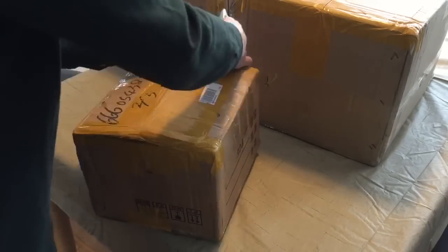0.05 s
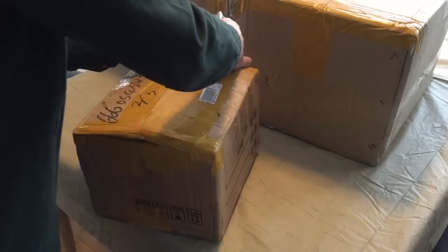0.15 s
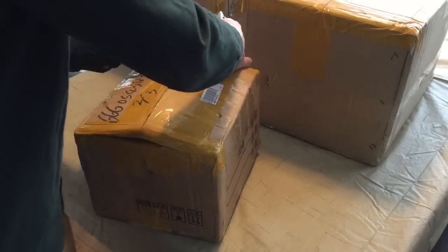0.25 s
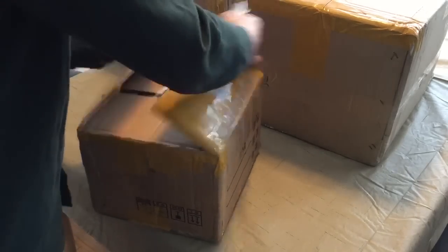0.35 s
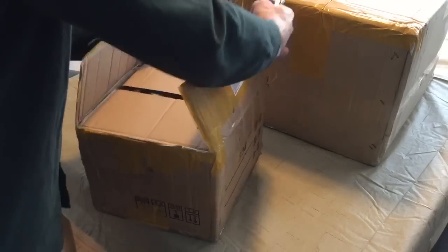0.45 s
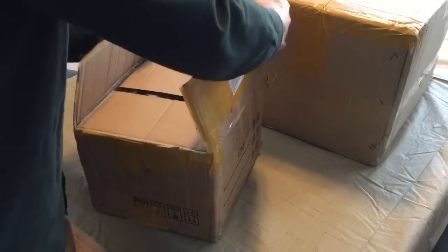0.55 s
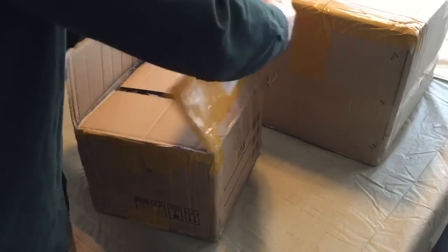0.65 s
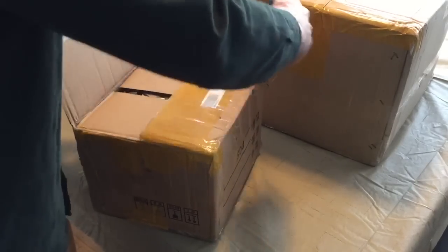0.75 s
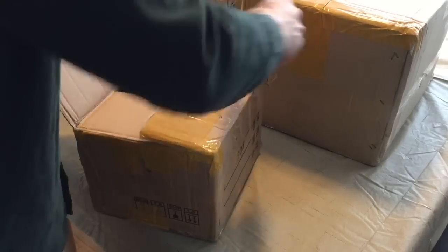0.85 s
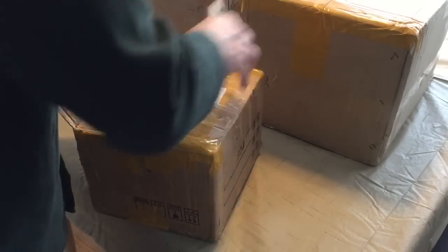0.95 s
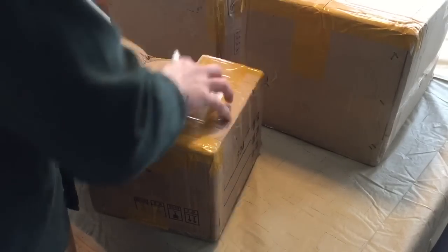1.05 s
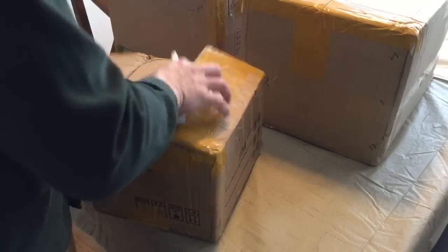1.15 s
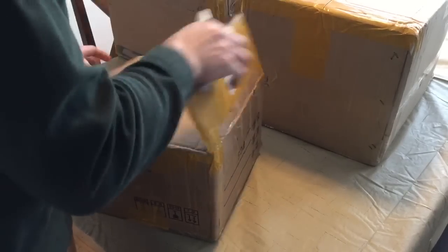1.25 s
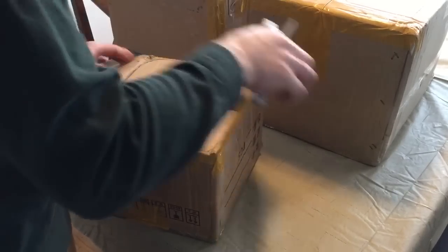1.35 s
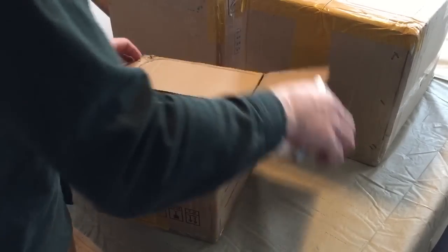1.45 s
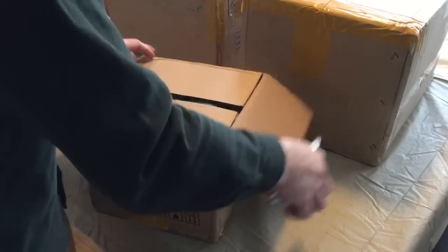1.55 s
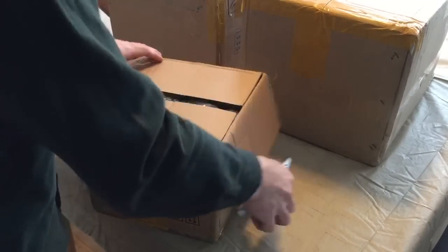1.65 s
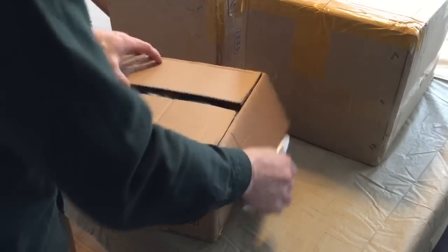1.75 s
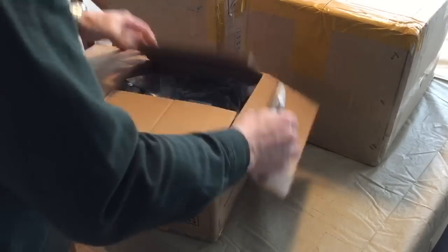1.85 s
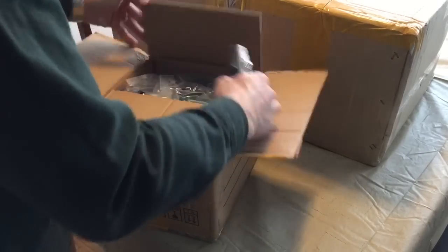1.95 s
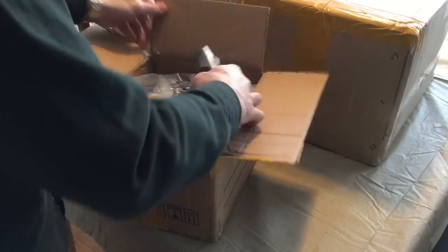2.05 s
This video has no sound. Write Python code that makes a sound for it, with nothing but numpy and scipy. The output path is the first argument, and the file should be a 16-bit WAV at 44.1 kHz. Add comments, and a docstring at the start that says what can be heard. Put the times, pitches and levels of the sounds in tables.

```python
"""Hands and sleeves brush a cardboard box in a small room, over a low rumble: noise shaped stroke by stroke.
Packing tape is pulled off and lets go in small snaps, short gritty pings that tug the panels into bumps.
It then tears free in a burst of noise with one sharp knock, which rings the box and the table under it.
More strokes, snaps and bumps follow as the flaps scrape, crinkle and bump while they are pulled open."""
import sys
import numpy as np
from scipy import signal
from scipy.fft import rfft, irfft, next_fast_len
from scipy.io import wavfile
from scipy.ndimage import uniform_filter1d, map_coordinates

SR = 44100
rng = np.random.default_rng(int(sys.argv[2]) if len(sys.argv) > 2 else 0)


def transcribe(signal):
    """Save signal, clipped to [-1, 1], as a 16-bit WAV file at the path in sys.argv[1]."""
    frames = np.atleast_2d(signal).T
    limited = np.clip(frames, -1, 1)
    pcm = np.round(limited * 32767).astype(np.int16)
    wavfile.write(sys.argv[1], SR, pcm)


N = 92610  # samples: 2.1 s

KNOCK_S = 0.4395  # when the box and table start to ring
PANEL_CUT_HZ = 115  # small panels radiate little below this


def amp(db):
    """Decibels to gain."""
    return 10 ** (np.asarray(db) / 20)


def unit(x):
    """x scaled to an average (rms) level of 1."""
    return x / np.sqrt(np.mean(x ** 2) + 1e-20)


def along(points, hz):
    """Read a value between (frequency, value) points on a log frequency axis."""
    f, v = np.transpose(points)
    return np.interp(np.log(hz + 1), np.log(f + 1), v)


def since(start_s):
    """Seconds since start_s, zero before it."""
    return np.maximum(np.arange(N) / SR - start_s, 0)


def fade(t, t60):
    """Decay that loses 60 dB in t60 seconds."""
    return np.exp(-np.log(1000) * t / t60)


def filtered(x, gain):
    """x times a gain that depends on frequency."""
    size = next_fast_len(len(x) + 8192)  # padded so the end does not wrap onto the start
    spectrum = rfft(x, size) * gain(np.fft.rfftfreq(size, 1 / SR))
    return irfft(spectrum, size)[:len(x)]


def low_cut(x, hz):
    """Second-order high-pass: weakens what lies below hz."""
    return signal.sosfilt(signal.butter(N=2, Wn=hz, btype="high", fs=SR, output="sos"), x)


def coloured(x, points):
    """x filtered by a table of levels over frequency, then set to rms 1."""
    return unit(filtered(x, lambda hz: amp(along(points, hz))))


def noise(points):
    """Fresh noise with the given spectrum, at rms 1."""
    return coloured(rng.standard_normal(N), points)


def wobble(rate):
    """A smooth random curve through rate random points a second."""
    return map_coordinates(rng.standard_normal(N // 20), [np.arange(N) * rate / SR], mode="wrap")


# How long the room rings: (frequency [Hz], t60 [s])
ROOM_DECAY = [(60, .5), (200, 0.33), (1000, 0.56), (2800, 0.48), (7000, 0.5), (15000, 0.2)]
# Tone of the room's answer: (frequency [Hz], relative level [dB])
ROOM_COLOUR = [(60, 2.5), (300, -3), (3000, -3.5), (8000, -5), (16000, -5.5)]
ROOM_DELAY_S = 0.003


def in_room(x, wet_db):
    """x plus the room's answer: noise in which each frequency dies at its own speed."""
    hz, t, z = signal.stft(rng.standard_normal(SR // 2), SR, nperseg=256)
    decaying = z * fade(t, along(ROOM_DECAY, hz)[:, None])
    tail = signal.istft(decaying, SR, nperseg=256)[1]
    tail = filtered(tail / np.linalg.norm(tail), lambda f: amp(along(ROOM_COLOUR, f)))
    delayed = np.pad(tail, (int(ROOM_DELAY_S * SR), 0))
    return x + amp(wet_db) * signal.fftconvolve(x, delayed)[:N]


# Room rumble and faint hiss: (frequency [Hz], relative level [dB])
FLOOR_COLOUR = [(20, -32.5), (40, -17), (65, -3.5), (90, -2.5), (125, -12.5), (250, -11.5), (500, -22.5),
                (1500, -32), (5000, -30.5), (9000, -29), (16000, -38)]
FLOOR_DB = -54


def room_floor():
    """Steady noise, strongest in the bass, is the sound of the quiet room."""
    return amp(FLOOR_DB) * noise(FLOOR_COLOUR)


RUB_PATCH_DB = 5  # the colour shifts as the contact moves over the cardboard


def patchy(x, depth_db):
    """x with short-lived resonances: small patches of time and pitch are made louder or softer."""
    z = signal.stft(x, nperseg=512)[2]
    field = rng.standard_normal(z.shape)
    field = uniform_filter1d(field, size=3, axis=0)  # smooth over pitch
    field = uniform_filter1d(field, size=7, axis=1)  # smooth over time
    return signal.istft(z * amp(depth_db * unit(field)), nperseg=512)[1][:N]


RUB_ROUGH_DB, RUB_ROUGH_HZ = 0.5, 109.9  # depth and rate of the uneven sliding
CRINKLE_SPREAD_DB, CRINKLE_DB = 3, -2.5  # spread of single crinkles; all of them against the sliding


def friction(colour, crinkles_per_s):
    """Uneven sliding noise with tiny crinkles, single random clicks, in it."""
    happens = rng.random(N) < crinkles_per_s / SR
    sign = rng.choice([-1, 1], N)
    strength = amp(CRINKLE_SPREAD_DB * np.minimum(rng.exponential(size=N), 4))
    crinkles = coloured(happens * sign * strength, colour)
    sliding = unit(patchy(noise(colour), RUB_PATCH_DB))
    roughness = amp(RUB_ROUGH_DB * wobble(RUB_ROUGH_HZ))
    return unit((sliding + amp(CRINKLE_DB) * crinkles) * roughness)


# Rubbing strokes: (start [s], rise [s], hold [s], release t60 [s],
#                   panel level [dB], scrape level [dB], hiss level [dB])
RUB_STROKES = [(0, 0.0013, 0.0097, 0.49, -47.5, -44.5, -53), (0.068, 0.009, 0.16, 0.34, -61, -59, -71),
               (0.222, 0.0049, 0.2, 0.14, -48.5, -44, -80), (0.743, 0.0087, 0.02, 0.22, -56, -48.5, -53),
               (0.779, 0.0094, 0.027, 0.11, -60, -66, -53.5), (0.831, 0.038, 0.048, 0.3, -49.5, -52, -47.5),
               (1.07, 0.0041, 0.017, 0.19, -51, -55.5, -62.5), (1.107, 0.0044, 0.027, 0.2, -70, -59.5, -54),
               (1.166, 0.013, 0.02, 0.52, -41.5, -42, -46), (1.292, 0.042, 0.0092, 0.14, -48, -46, -48.5),
               (1.391, 0.044, 0.067, 0.97, -52, -50.5, -47.5),
               (1.489, 0.078, .065, 0.28, -49, -50.5, -50.5), (1.677, 0.07, 0.034, 0.22, -48, -63.5, -59.5),
               (1.777, 0.04, 0.013, 0.5, -54, -50, -49), (1.879, 0.018, 0.034, 0.26, -55, -42, -45.5),
               (1.956, .008, 0.029, 0.67, -51, -47, -45)]
# Colours of the hollow panel, papery scrape and fine hiss: (frequency [Hz], relative level [dB])
PANEL_COLOUR = [(40, -39), (130, 0), (220, 5), (330, 1), (650, 3), (1100, -15.5), (2500, -46), (16000, -55)]
SCRAPE_COLOUR = [(100, -25), (500, -11), (1000, 0.5), (1600, 2), (2450, -3), (3300, -1), (4100, -3),
                 (4900, -14), (6500, -3.5), (16000, -67)]
HISS_COLOUR = [(300, -8), (2000, -25), (4000, -3), (5200, 1), (7000, 2), (9300, 4), (10500, 0),
               (12000, 2.5), (16000, -8)]
# Average crinkle rate, one value each for panel, scrape and hiss: (rate [1/s])
CRINKLE_RATES = [300, 260, 1400]
RUB_ROOM_DB = -9.5


def rubbing():
    """Each stroke of hand, sleeve or flap drives the hollow panel, a papery scrape and a fine hiss."""
    powers = np.zeros((3, N))
    for start, rise, hold, release, *dbs in RUB_STROKES:
        shape = np.minimum(since(start) / rise, 1) * fade(since(start + rise + hold), release)
        powers += (amp(dbs)[:, None] * shape) ** 2  # overlapping strokes add as power
    colours = (PANEL_COLOUR, SCRAPE_COLOUR, HISS_COLOUR)
    dry_rub = sum(np.sqrt(power) * friction(colour, rate)
                  for power, colour, rate in zip(powers, colours, CRINKLE_RATES))
    return in_room(dry_rub, RUB_ROOM_DB)


def pings(rows, grit, width_oct, attack_s):
    """Each row is a short damped swing with noisy grit around its pitch."""
    out, t = np.zeros(N + SR), np.arange(SR // 10) / SR
    for start, db, hz, t60 in rows:
        def near_pitch(f):
            return np.exp(-0.5 * (np.log2((f + 1) / hz) / width_oct) ** 2)

        rough = unit(filtered(rng.standard_normal(len(t)), near_pitch))
        swing = np.sin(2 * np.pi * hz * t) + grit * rough
        shape = fade(t, t60) * (1 - np.exp(-t / attack_s))
        out[int(start * SR):][:len(t)] += amp(db) * swing * shape
    return out[:N]


# Tape and crease snaps: (time [s], level [dB], pitch [Hz], ring t60 [s])
SNAP_CLICKS = [(.0072, -33, 11500, .002), (.077, -26, 3360, 0.0021), (.079, -34, 6100, 0.0028),
               (0.095, -30, 8800, 0.0021), (0.1384, -29, 4000, 0.0054), (0.171, -18, 2470, 0.011),
               (0.1728, -19, 7500, 0.0012), (0.1767, -8.5, 11600, 0.00067), (0.1867, -15, 10400, 0.00092),
               (0.2398, -18.5, 1570, 0.012), (0.2402, -10.5, 6400, 0.0013), (0.2445, -13.5, 8150, 0.0015),
               (0.2991, -26, 4400, 0.0036), (.304, -22, 9700, 0.0013), (.3328, -24, 7500, 0.0028),
               (.3486, -14.5, 3430, 0.0075), (.3488, -16.5, 7870, 0.0025), (0.4007, -19.5, 6640, 0.0019),
               (0.4586, -18.5, 11550, 0.00206), (0.4627, -14, 8500, 0.0042), (0.4648, -9, 3000, 0.0044),
               (.4712, -5, 12800, 0.0014), (.5635, -30, 9450, 0.0068), (.626, -26, 6450, 0.0026),
               (0.7465, -19.5, 8800, 0.00053), (0.7555, -27, 2670, 0.0038), (0.837, -20, 8300, 0.00067),
               (0.853, -27, 8000, .003), (0.8981, -14.5, 6900, 0.0012), (0.9448, -27.5, 7860, 0.0028),
               (.9525, -23.5, 7870, 0.0019), (1.2731, -12, 12000, 0.0011), (1.2808, -19, 9700, 0.0018),
               (1.309, -21, 7700, 0.0016), (1.3226, -28, 9500, 0.0018), (1.3306, -12, 10100, 0.00071),
               (1.3331, -19, 9600, 0.0039), (1.3336, -27, 2420, 0.0027), (1.4246, -22.5, 10500, 0.0025),
               (1.4357, -20, 9400, 0.0011), (1.4386, -15, 9200, 0.0012), (1.4397, -30, 2040, 0.012),
               (1.4414, -26, 9100, 0.0016), (1.5085, -30, 9500, 0.0038), (1.6856, -29.5, 8540, 0.0023),
               (1.7719, -37, 3520, 0.0057), (1.827, -33, 3960, 0.0032), (1.9647, -44, 3800, 0.0042),
               (1.966, -26, 9100, 0.0039), (1.967, -27.5, 1390, 0.0057)]
# Colour of the sheet that each snap shakes: (frequency [Hz], relative level [dB])
SHEET_COLOUR = [(100, -26.5), (400, -7), (1200, -6), (2400, -0.5), (4200, 5), (5500, -11.5), (9000, 4),
                (16000, -32.5)]
SNAP_GRIT, SNAP_WIDTH_OCT, SNAP_ROOM_DB = 0.67, 1.15, -4.5
SNAP_SHEET_DB, SHEET_T60_S = -13, 0.015
SHEET_HZ = 3270  # snaps pitched above this shake the sheet less


def snaps():
    """Stiff tape and creases buckle in single clicks; each briefly shakes the sheet around it."""
    shake_power = np.zeros(N)
    for start, db, hz, _ in SNAP_CLICKS:
        t = since(start)
        shake = amp(db) * fade(t, SHEET_T60_S) * (t > 0) * np.minimum(1, SHEET_HZ / hz)
        shake_power += shake ** 2
    clicks = pings(SNAP_CLICKS, SNAP_GRIT, SNAP_WIDTH_OCT, attack_s=0.00003)
    sheet = amp(SNAP_SHEET_DB) * np.sqrt(shake_power) * noise(SHEET_COLOUR)
    return in_room(clicks + sheet, SNAP_ROOM_DB)


# Bumps of the cardboard panels: (time [s], level [dB], pitch [Hz], ring t60 [s])
PANEL_BUMPS = [(.1755, -19, 284, .03), (.2425, -18.5, 215, 0.049), (.243, -23.5, 372, 0.026),
               (.244, -25.5, 1144, 0.031), (.3335, -22.5, 309, 0.04), (.402, -29, 275, 0.032),
               (.4615, -10, 238, 0.035), (.481, -14.5, 256, 0.027), (.747, -32.5, 820, 0.017),
               (.856, -34.5, 710, 0.017), (.8745, -29.5, 326, 0.061), (1.078, -39.5, 290, 0.013),
               (1.0785, -36, 990, 0.012), (1.096, -40.5, 195, 0.062), (1.115, -52, 162, 0.057),
               (1.2105, -21.5, 328, 0.025), (1.27, -50, 203, 0.11), (1.335, -39, 690, 0.038),
               (1.439, -35, 660, 0.026), (1.7422, -19, 645, 0.0069), (1.837, -31.5, 425, 0.029)]
BUMP_ATTACK_S, BUMP_GRIT, BUMP_WIDTH_OCT, BUMP_ROOM_DB = 0.00045, 0.23, 0.64, -2


def bumps():
    """Tugged or bumped panels swing briefly and die away."""
    swings = pings(PANEL_BUMPS, BUMP_GRIT, BUMP_WIDTH_OCT, BUMP_ATTACK_S)
    return in_room(low_cut(swings, PANEL_CUT_HZ), BUMP_ROOM_DB)


# The tape tears free: (time [s], level [dB], length before the fade [s])
TEAR_BURSTS = [(0.4374, -5.5, 0.0028), (0.462, -20, 0.0052), (0.469, -29, .002)]
# Colour of the tearing noise: (frequency [Hz], relative level [dB])
TEAR_SPECTRUM = [(60, -43), (500, -9.5), (1000, -4.5), (1400, 2.5), (1950, -11.5), (2400, 1.5), (2850, -1),
                 (3700, -10), (5500, -15.5), (7000, -12), (9500, -14.5), (11000, -22), (16000, -25)]
TEAR_RISE_S, TEAR_T60_S, TEAR_ROOM_DB = 0.00062, 0.0058, -6.5


def tear():
    """The taut tape parts in a few milliseconds, then its loose end whips twice."""
    level = np.zeros(N)
    for start, db, length in TEAR_BURSTS:
        rise = np.minimum(since(start) / TEAR_RISE_S, 1)
        level += amp(db) * rise * fade(since(start + length), TEAR_T60_S)
    return in_room(level * noise(TEAR_SPECTRUM), TEAR_ROOM_DB)


def ringing(modes, attack_s):
    """Natural tones (modes) set off by the knock, each dying at its own speed."""
    t = since(KNOCK_S)
    tones = sum(amp(db) * np.sin(2 * np.pi * hz * t) * fade(t, t60) for hz, db, t60 in modes)
    return tones * (1 - np.exp(-t / attack_s))


# Natural tones of the box: (frequency [Hz], level [dB], t60 [s])
BOX_MODES = [(214.4, -11, 0.18), (238, -7, 0.029), (256, -12.5, 0.089), (336.3, -17.5, 0.19),
             (377, -19.5, 0.34), (470.7, -31, 0.26), (515, -27, .18), (718, -21, 0.13), (1103, -21, 0.082),
             (1340, -28, 0.06), (1482, -28.5, 0.097), (2320, -30, 0.13), (2730, -29.5, 0.31),
             (2920, -28.5, 0.26)]
# Natural tones of the table: (frequency [Hz], level [dB], t60 [s])
TABLE_MODES = [(64.8, -24, 0.48), (79.2, -22.5, 0.34), (96, -31, 0.18), (132, -25, 0.36),
               (160.5, -32.5, .15)]
# Colour of the loose flaps and tape: (frequency [Hz], relative level [dB])
SHUDDER_COLOUR = [(40, -21.5), (130, -6), (220, 1), (400, -1), (600, -6.5), (900, -7.5), (1400, -10.5),
                  (1950, -9.5), (2750, -6), (3600, -15), (5500, -22), (7000, -18), (9500, -23),
                  (11000, -25), (16000, -27)]
BOX_ATTACK_S, BOX_ROOM_DB, TABLE_ATTACK_S = 0.0014, -12.5, 0.015
SHUDDER_DB, SHUDDER_T60_S, SHUDDER_ROOM_DB = -14, 0.25, -6


def knock():
    """The released box springs back: it rings, its flaps shudder and the table booms."""
    t = since(KNOCK_S)
    shudder = amp(SHUDDER_DB) * noise(SHUDDER_COLOUR) * fade(t, SHUDDER_T60_S) * (t > 0)
    box = low_cut(ringing(BOX_MODES, BOX_ATTACK_S), PANEL_CUT_HZ)
    table = ringing(TABLE_MODES, TABLE_ATTACK_S)
    return in_room(box, BOX_ROOM_DB) + in_room(shudder, SHUDDER_ROOM_DB) + table


def scene():
    """All the handling over the room's low rumble."""
    return (snaps() + bumps() + tear() + knock() + rubbing() + room_floor())[None]


LOW_CUT_HZ, TOP_HZ = 20, 15850


def record(dry):
    """Thin the deepest bass, round off the highest peaks and keep nothing from the top limit up."""
    x = low_cut(dry[0], LOW_CUT_HZ)
    rounded = x / (1 + np.abs(x / 0.93) ** 6) ** (1 / 6)  # peaks level off towards 0.93
    return filtered(rounded, lambda hz: hz < TOP_HZ)[None]


dry = scene()
out = record(dry)
transcribe(out)
```